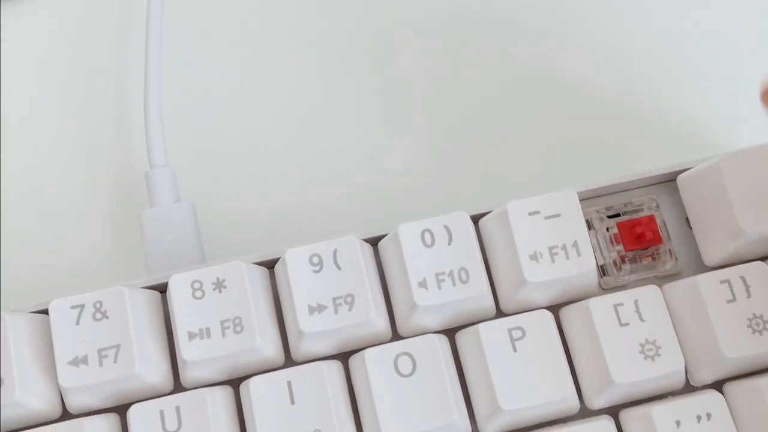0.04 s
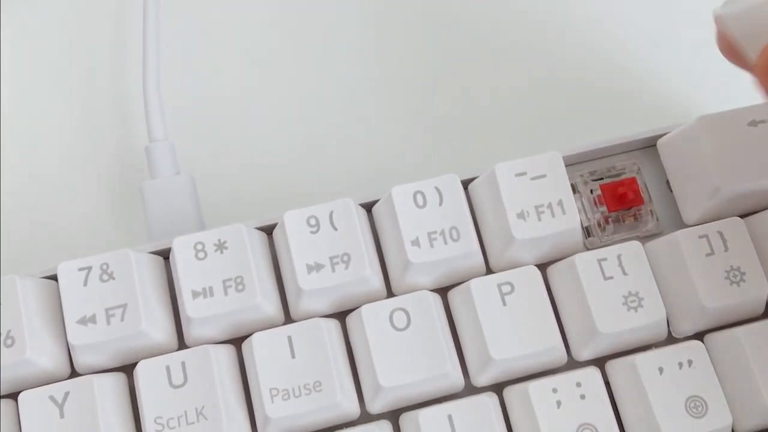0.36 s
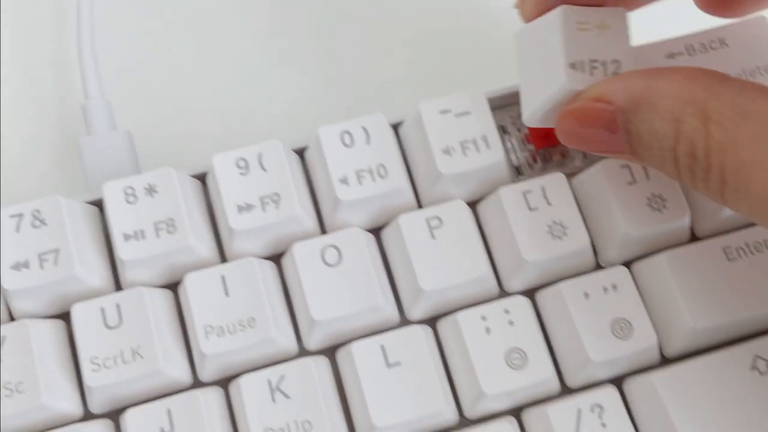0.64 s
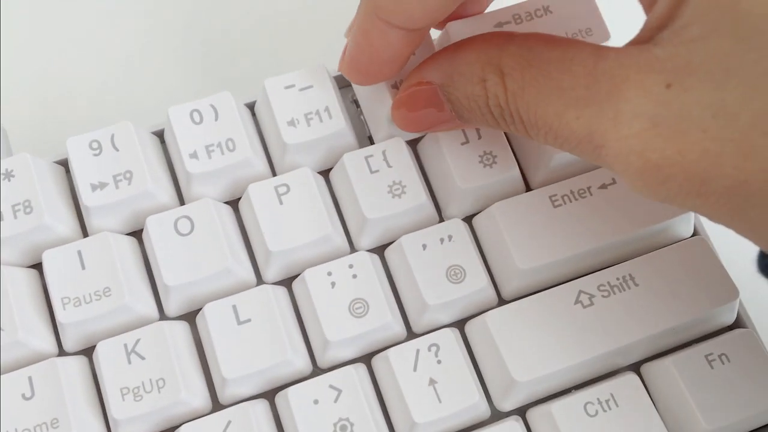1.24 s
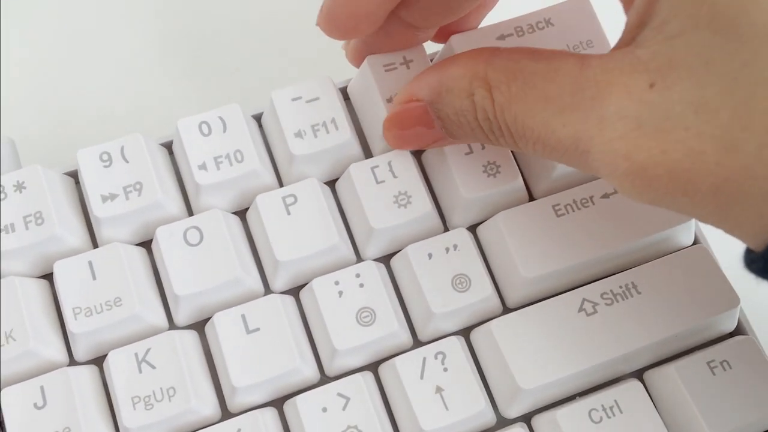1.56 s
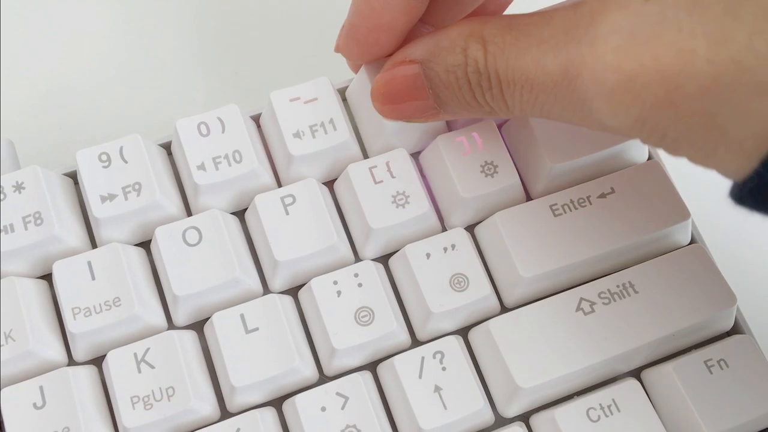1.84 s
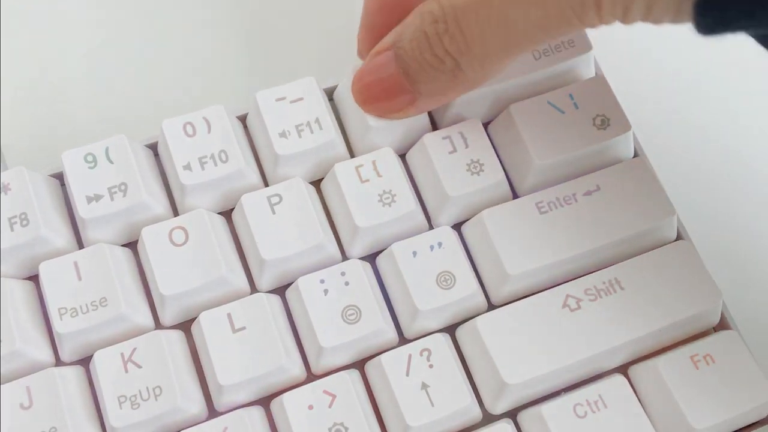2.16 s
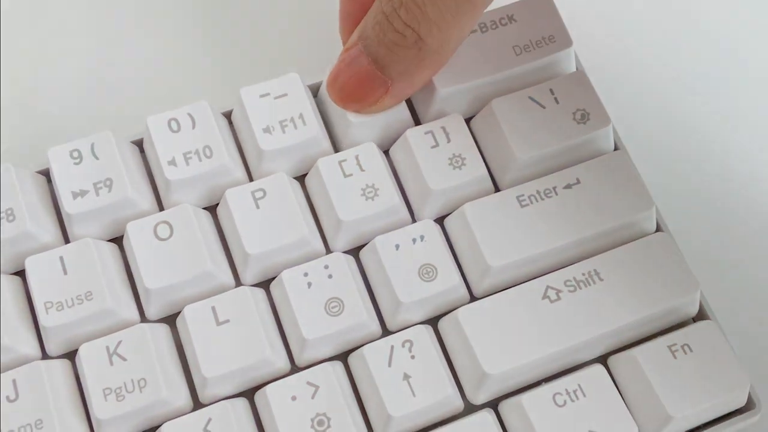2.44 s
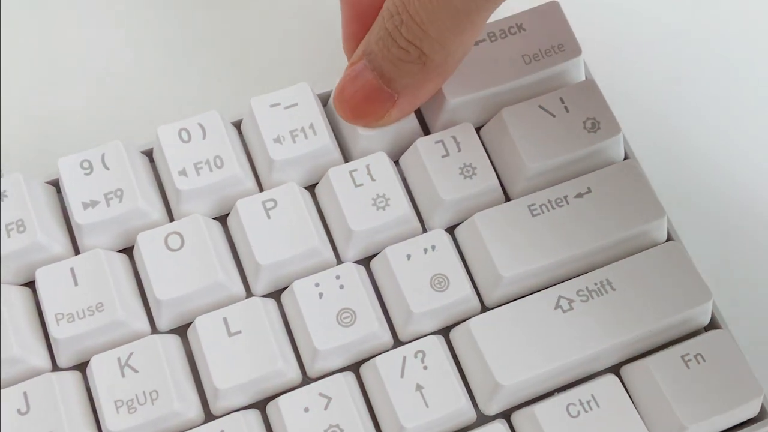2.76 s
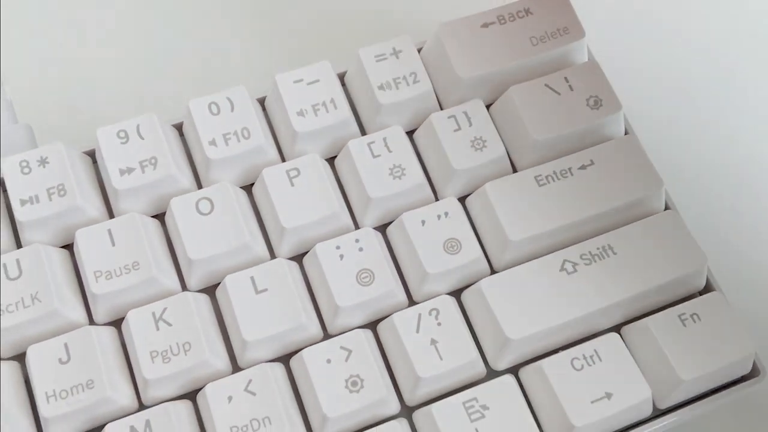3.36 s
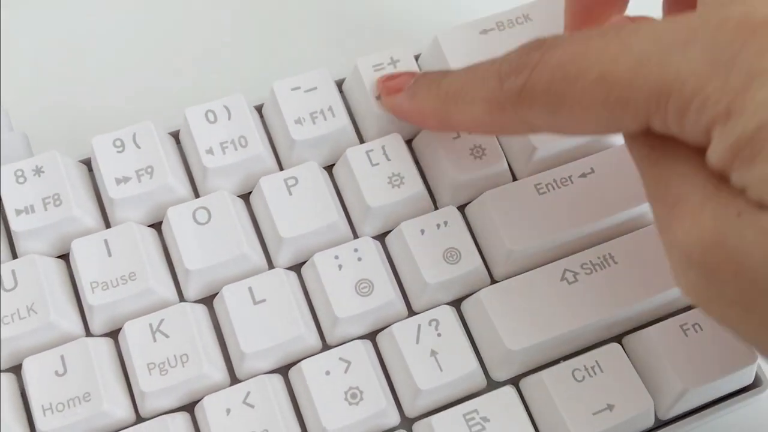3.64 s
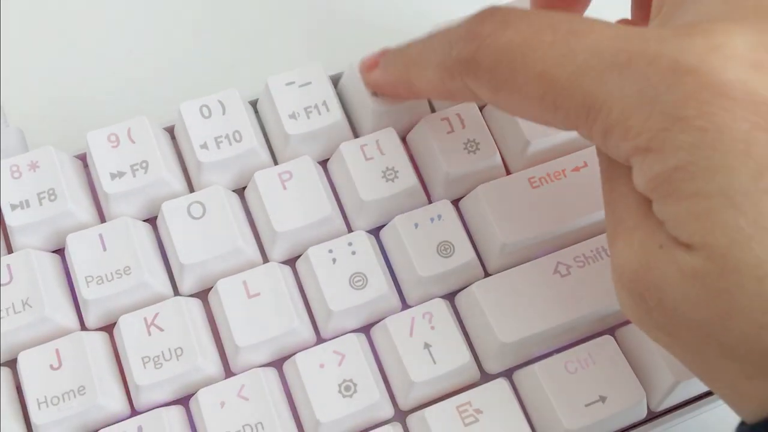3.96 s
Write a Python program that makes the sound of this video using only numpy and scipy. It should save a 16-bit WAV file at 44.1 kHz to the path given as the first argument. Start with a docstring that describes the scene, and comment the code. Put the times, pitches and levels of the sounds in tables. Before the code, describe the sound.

Close, dry clicks of a plastic keycap going onto a keyboard: faint handling ticks, a brief squeaky scrape, scattered small snaps, then a sharper click and one hard tap. A low machine hum sits behind in the quiet room.

```python
"""Over a low machine hum in a quiet room, a plastic keycap ticks and rubs as fingers turn it, close up.
It scrapes onto the stem of a keyboard switch with a thin squeak and is pushed home in small snaps.
The key is let up, touched again and tapped hard. Every contact briefly rings cap, plate and case
and leaves a noisy crack; the rubs and the scrape are dense tiny slips that ring the plastic."""
import sys
import numpy as np
from scipy import signal
from scipy.fft import rfft, irfft
from scipy.io import wavfile

SR = 44100
rng = np.random.default_rng(int(sys.argv[2]) if len(sys.argv) > 2 else 0)


def int16_out(signal):
    """Quantize to a 16-bit WAV file."""
    q = np.round(np.clip(np.atleast_2d(signal).T, -1, 1) * 32767)
    wavfile.write(sys.argv[1], SR, q.astype(np.int16))


N = 176400

# Fader rides for the machine hum, a higher hum that swells briefly, and the low rumble.
# Each row: time in seconds, level in dB.
HUM_RIDE = [(0.0, -36), (0.02, -42.5), (0.96, -51), (1.05, -59), (1.27, -41), (1.41, -45.5), (1.66, -37.5),
            (2.51, -50), (2.54, -41.5), (2.63, -43), (2.99, -39), (3.06, -43), (3.15, -67), (3.2, -45.5),
            (3.95, -41.5), (4.0, -56)]
UPPER_HUM_RIDE = [(0, -69), (.35, -56), (.85, -65), (.98, -52), (1.14, -46), (1.25, -58), (4, -77)]
RUMBLE_RIDE = [(0, -69), (1.2, -65), (1.45, -47), (2.55, -49.5), (2.65, -40), (2.75, -50.5), (3.1, -52),
               (3.7, -49.5), (4.0, -42.5)]
HUM_HZ, UPPER_HUM_HZ, RUMBLE_HZ = 58.87, 113.1, 72.4
# The room's narrow drones. Each row: pitch in Hz, level in dB before filtering, t60 in seconds.
DRONE_BANDS = [(112.5, -62.5, 0.28), (133.3, -63.5, 0.37), (164.4, -60, 0.25), (229.7, -54, 0.26),
               (298, -57, 0.31), (335.3, -58, 0.79), (396.4, -63, 0.15)]
# Their slow swell. Each row: time in seconds, gain in dB.
DRONE_RIDE = [(0, -2), (1, -0.5), (2, 0), (3, 1), (4, -0.5)]
# EQ curve of the room's air. Each row: frequency in Hz, relative level in dB.
AIR_EQ = [(25, -20), (40, -5), (90, -6.5), (160, -7.5), (200, -14), (290, -9.5), (450, -17), (620, -21),
          (760, -24.5), (1150, -24), (1520, -28.5), (2500, -34), (5000, -40.5), (9000, -43), (10500, -45),
          (12000, -43.5), (16000, -48)]
# The reverb tail. Each row: octave centre in Hz, level in dB, t60 in seconds.
REVERB_BANDS = [(570, -24, 0.32), (1050, -25.5, 0.23), (2200, -26, 0.35), (4360, -26.5, 0.27),
                (7500, -26, 0.21), (14000, -23, 0.15)]
# Slaps off nearby surfaces. Each row: delay in seconds, level in dB.
EARLY_ECHOES = [(0.014, -28), (.027, -33)]
AIR_DB, PREDELAY_S, CUTOFF_HZ = -50, .008, 15900

# Fingertips rubbing the loose cap, and the stem sliding in its housing.
# Each row: start in seconds, level in dB, length in seconds, treble shelf above 10 kHz in dB.
FINGER_RUBS = [(.047, -42.5, 0.013, -4), (.479, -48, 0.0073, -8), (.9445, -44, 0.0077, -3),
               (.17, -60, 0.032, -3.5), (.265, -64.5, .04, 1), (.33, -70, 0.072, 13),
               (.415, -61.5, 0.046, -10), (.645, -60.5, .03, -10), (1.81, -63.5, 0.095, -12),
               (2.02, -68, .03, -9), (2.2, -72, 0.077, 5), (3.341, -62.5, 0.0047, 5),
               (3.495, -72, 0.034, 12.5), (3.737, -60, 0.017, -4)]
STEM_SLIDES = [(3.152, -62, 0.032, -4), (3.172, -52, 0.027, 2), (3.9278, -40, 0.019, -3)]
# Rides for the cap scraping over the stem and its squeak as the pressure peaks.
# Each row: time in seconds, level in dB.
SCRAPE_RIDE = [(.965, -64), (.971, -41.5), (.983, -40.5), (.989, -40), (.996, -42), (1.008, -34),
               (1.012, -40), (1.017, -72)]
SQUEAK_RIDE = [(.965, -75), (.983, -55), (.988, -48), (1.0, -41), (1.008, -39.5), (1.015, -79)]
# Resonances that colour the loose cap, the stem, the scrape and the squeak.
# Each row: pitch in Hz, relative level in dB, t60 in seconds.
CAP_TONES = [(6950, 2, 0.0098), (7920, -2, 0.025), (8300, -2.5, 0.0059), (11650, -2.5, 0.016),
             (12240, -1, 0.015), (14200, -3, 0.0046)]
STEM_TONES = [(1250, -7, 0.025), (1710, -5, 0.017), (3080, -1, 0.0022), (6750, -4, 0.0031),
              (12800, -4, .002)]
SCRAPE_TONES = [(876, -7, 0.038), (1313, 4, 0.02), (1540, -0.5, .012), (1760, -4, 0.02), (2310, -6.5, .014),
                (3150, -4.5, 0.01), (3740, -5, 0.006), (5530, -12, .009), (6900, -8.5, 0.004),
                (7900, -5.5, 0.0077), (12700, -11, .0015)]
SQUEAK_TONES = [(9300, -0.5, 0.005), (9460, 0, 0.0072), (9730, -7, 0.0067)]
SLIPS_PER_S, SLIP_SPREAD_DB = 4000, 2.5

# Hits of cap, stem and case. Each row: start in seconds, five EQ gains in dB (thud, clack, snap, tick,
# fizz), ringing share from 0 to 1 (less under a gripping finger).
HITS = [(1.0006, -49, -63, -70, -54, -43, 0.17), (1.0092, -38, -41.5, -69, -67, -63, 0.27),
        (1.141, -50.5, -55, -55.5, -77, -58, 0.22), (1.2023, -59, -64, -69, -81, -80, 0.36),
        (1.259, -59, -69, -63, -68, -65, 0.45), (1.318, -59, -65, -60.5, -73, -76, 0.54),
        (1.3835, -54.5, -60, -68, -73, -80, 0.1), (1.3966, -51, -52, -46, -53, -52, 0.16),
        (1.431, -57, -53, -45.5, -53, -48.5, 0.47), (1.4448, -48.5, -69, -67, -70, -70, 0.33),
        (1.477, -47, -41.5, -40, -41.5, -41, 0.48), (1.603, -67, -65, -66, -66, -80, .6),
        (1.633, -52, -60, -65, -69, -74, .5), (1.7887, -58, -62.5, -70, -68, -80, 0.4),
        (1.9899, -59, -66, -68, -71, -69, 0.55), (2.1497, -71, -56.5, -40.5, -56.5, -57, 0.22),
        (2.6558, -59, -68, -54.5, -76, -80, 0.2), (3.1481, -35.5, -77, -62, -65, -57, 0.25),
        (3.1888, -36.5, -39.5, -35, -41.5, -41, 0.35), (3.2155, -52, -57, -72, -61, -60, 0.1),
        (3.2815, -63, -60, -65, -69, -65, 0.24), (3.71, -56, -53, -59, -62, -55, 0.67),
        (3.7209, -77, -39, -55.5, -50.5, -56, .5), (3.7835, -56, -57, -58, -66, -58, .6),
        (3.7992, -61, -67, -69, -72, -74, 0.2), (3.931, -67, -42, -58, -50, -35, 0.4),
        (3.9382, -56, -48, -64, -62, -56, 0.3), (3.9482, -28.5, -30, -31.5, -28.5, -34.5, 0.78)]
# The centres of thud, clack, snap, tick and fizz in Hz.
HIT_EQ_HZ = [1150, 1650, 3300, 6800, 13000]
# The ring of cap, plate and case. Each row: pitch in Hz, relative level in dB, undamped t60 in seconds.
BODY_MODES = [(590, -8, 0.039), (1154.4, -0.5, 0.053), (1410, -2.5, 0.03), (1588, -1, 0.053),
              (1793, -7.5, 0.042), (2690, -20.5, 0.017), (3230, 0.5, 0.022), (3680, -8, 0.011),
              (5830, -3, 0.0058), (6745, -5, 0.021), (7330, -1, 0.0056), (11100, -8.5, 0.011),
              (12100, -7.5, .012), (13840, -10, 0.0059)]
# The noisy crack of a hit. Each row: octave centre in Hz, relative level in dB, undamped t60 in seconds.
CRACK_BANDS = [(605, -16.5, 0.062), (1175, -5.5, 0.063), (1890, -1, .035), (3110, -2, 0.042),
               (4550, -10, 0.03), (7020, -7, 0.041), (13500, -14, 0.022)]
CHATTER_S, CHATTER_DB = 0.00083, -12   # the faces rattle as they meet
REBOUND_S, REBOUND_DB = .0019, -7.5
MODE_SPREAD_DB, ATTACK_CYCLES, CRACK_EDGE_DB = 1.0, 3.3, -4.5
GRIP_DAMPING = 0.65   # share of the ring time that a full grip takes away
BASS_HZ, SOFT_BASS = 575, 0.15   # dull hits gain bass: dB of lift per dB of thud over clack


def from_db(db):
    return 10 ** (np.asarray(db) / 20)


def rms_one(x):
    return x / np.sqrt(np.mean(x ** 2) + 1e-20)


def unit_energy(x):
    return x / np.sqrt(np.sum(x ** 2) + 1e-20)


def fader(ride):
    """Gain over time from points in seconds and dB."""
    return from_db(np.interp(np.arange(N) / SR, *np.transpose(ride)))


def add(out, start_s, x):
    """Mix x in at its cue."""
    i = max(int(start_s * SR), 0)
    out[i:i + len(x)] += x[:max(N - i, 0)]


def ring(x, hz, t60):
    """One damped resonance, falling 60 dB in t60 seconds."""
    radius, angle = from_db(-60 / (t60 * SR)), 2 * np.pi * hz / SR
    return signal.lfilter([1, 0, -1], [1, -2 * radius * np.cos(angle), radius * radius], x + 1e-18)


def octave(x, hz):
    """An octave band around hz."""
    edges = [hz / np.sqrt(2), min(hz * np.sqrt(2), .45 * SR)]
    return signal.sosfilt(signal.butter(2, edges, "band", fs=SR, output="sos"), x)


def dying_noise(hz, t60, size, edge=0):
    """An octave of noise that dies away, led by a click of strength edge."""
    decay = from_db(-60 * np.arange(size) / SR / t60)
    scatter = unit_energy(rng.standard_normal(size) * decay)
    scatter[0] += edge
    return unit_energy(octave(octave(scatter, hz), hz))


def machine_hum():
    """Two low tones and an octave of rumble, each wavering in level."""
    t = np.arange(N) / SR
    hum = fader(HUM_RIDE) * np.sin(2 * np.pi * HUM_HZ * t)
    hum += fader(UPPER_HUM_RIDE) * np.sin(2 * np.pi * UPPER_HUM_HZ * t)
    rumble = rms_one(octave(rng.standard_normal(N + SR), RUMBLE_HZ)[SR:])
    return np.sqrt(2) * hum + fader(RUMBLE_RIDE) * rumble


def room_tone():
    """Noise rings the room's narrow drones over a soft, dark bed of air."""
    drone = sum(from_db(db) * rms_one(ring(rng.standard_normal(N + SR), hz, t60)[SR:])
                for hz, db, t60 in DRONE_BANDS)
    drone = signal.sosfilt(signal.butter(2, [55, 520], "band", fs=SR, output="sos"), drone)
    eq_hz, eq_db = np.transpose(AIR_EQ)
    bin_hz = np.arange(N // 2 + 1) * SR / N
    eq = from_db(np.interp(np.log(bin_hz + 1e-9), np.log(eq_hz), eq_db))
    air = irfft(rfft(rng.standard_normal(N)) * eq, N)
    air = signal.sosfilt(signal.butter(2, 28, "high", fs=SR, output="sos"), air)
    return fader(DRONE_RIDE) * drone + from_db(AIR_DB) * rms_one(air)


def reverb(x):
    """The room answers with two early echoes and a faint short tail, duller as it dies."""
    tail = sum(from_db(db) * dying_noise(hz, t60, size=SR // 2) for hz, db, t60 in REVERB_BANDS)
    out = np.zeros(N)
    add(out, PREDELAY_S, signal.fftconvolve(x, tail)[:N])
    for delay_s, db in EARLY_ECHOES:
        add(out, delay_s, from_db(db) * x)
    return out


def friction(tones):
    """Dense, uneven slips ring the plastic into a steady grainy texture."""
    sizes = from_db(SLIP_SPREAD_DB * np.minimum(rng.exponential(1, N), 3))
    slips = sizes * rng.choice([-1, 1], N) * (rng.random(N) < SLIPS_PER_S / SR)
    return rms_one(sum(from_db(db) * rms_one(ring(slips, hz, t60)) * (-1) ** k
                       for k, (hz, db, t60) in enumerate(tones)))


def rubs(cues, tones, taper):
    """Short strokes of friction that swell and fade, each with its own brightness."""
    out, rub = np.zeros(N), friction(tones)
    dull = signal.sosfiltfilt(signal.butter(2, 10000, fs=SR, output="sos"), rub)
    for start_s, db, length_s, treble_db in cues:
        pressure = np.zeros(N)
        add(pressure, start_s, from_db(db) * signal.windows.tukey(int(length_s * SR), taper))
        out += pressure * (dull + from_db(treble_db) * (rub - dull))
    return out


def scrape(ride, tones):
    """The cap drags over the stem in one unbroken stroke of friction."""
    t = np.arange(N) / SR
    gate = (t > ride[0][0]) & (t < ride[-1][0])
    return fader(ride) * friction(tones) * gate


def hit(eq_db, ringing):
    """A blow, its rattle and rebound ring the body, with a crack on top; a grip chokes both."""
    t = np.arange(SR // 8) / SR
    decay_scale = 1 - GRIP_DAMPING * (1 - ringing)
    force = from_db(CHATTER_DB) * rng.standard_normal(len(t)) * np.exp(-t / CHATTER_S)
    force[0] += 1
    force[int(REBOUND_S * SR * rng.uniform(.85, 1.15))] += from_db(REBOUND_DB)
    thud_db, clack_db = eq_db[:2]
    bass_db = thud_db + SOFT_BASS * max(thud_db - clack_db, 0)

    def eq(hz):
        return from_db(np.interp(np.log(hz), np.log([BASS_HZ, *HIT_EQ_HZ]), [bass_db, *eq_db]))

    body, crack = np.zeros((2, len(t)))
    for k, (hz, db, t60) in enumerate(BODY_MODES):
        gain = eq(hz) * from_db(db + MODE_SPREAD_DB * rng.standard_normal())
        attack = 1 - np.exp(-t * hz / ATTACK_CYCLES)
        body += (-1) ** k * gain * unit_energy(attack * ring(force, hz, t60 * decay_scale))
    for k, (hz, db, t60) in enumerate(CRACK_BANDS):
        burst = dying_noise(hz, t60 * decay_scale, size=len(t), edge=from_db(CRACK_EDGE_DB))
        crack += (-1) ** k * eq(hz) * from_db(db) * burst
    blend = np.sqrt(ringing) * body + np.sqrt(1 - ringing) * crack
    return blend * np.sqrt(.016 * SR)   # unit energy becomes rms 1 over 16 ms


def keycap():
    """The close foley: finger rubs, stem slides, scrape, squeak and every snap and tap."""
    out = rubs(FINGER_RUBS, CAP_TONES, taper=0.56) + rubs(STEM_SLIDES, STEM_TONES, taper=0.072)
    out += scrape(SCRAPE_RIDE, SCRAPE_TONES) + scrape(SQUEAK_RIDE, SQUEAK_TONES)
    for start_s, *eq_db, ringing in HITS:
        add(out, start_s, hit(eq_db, ringing))
    return out


def scene():
    """The mono mix: the key up front, reverb, hum and room tone behind."""
    key = keycap()
    return (key + reverb(key) + machine_hum() + room_tone())[None]


def record(dry):
    """A steep high cut takes off the very top."""
    return signal.sosfilt(signal.ellip(10, .2, 80, CUTOFF_HZ, fs=SR, output="sos"), dry)


dry = scene()
out = record(dry)
int16_out(out)
```